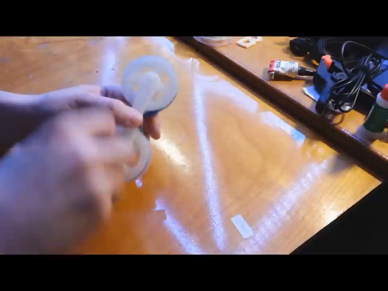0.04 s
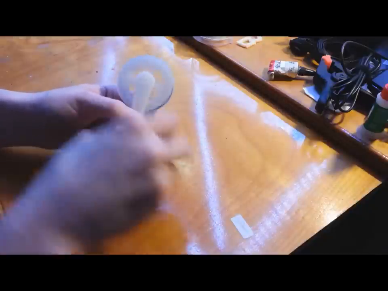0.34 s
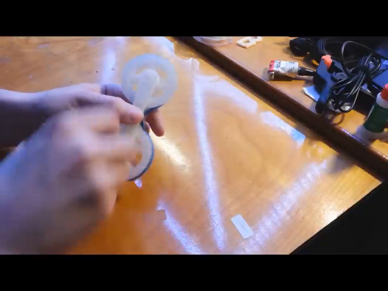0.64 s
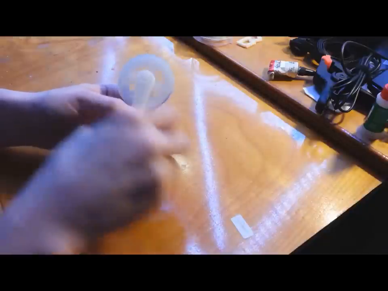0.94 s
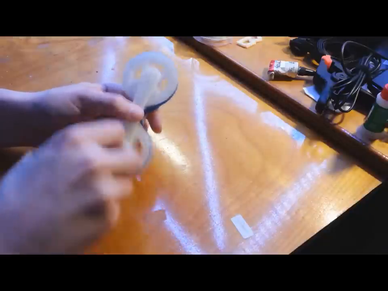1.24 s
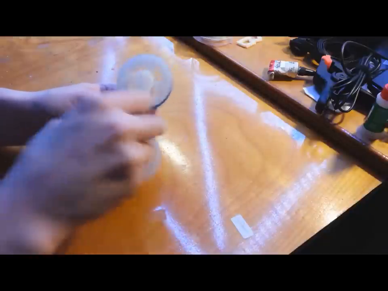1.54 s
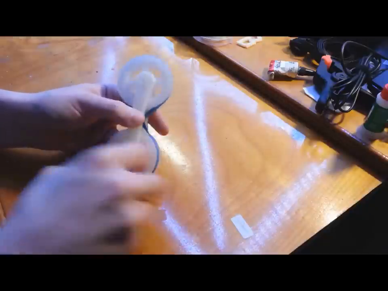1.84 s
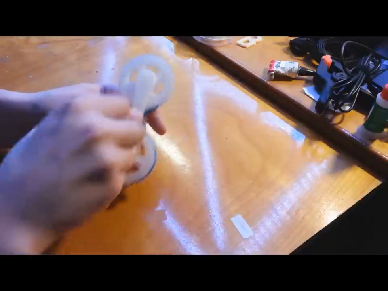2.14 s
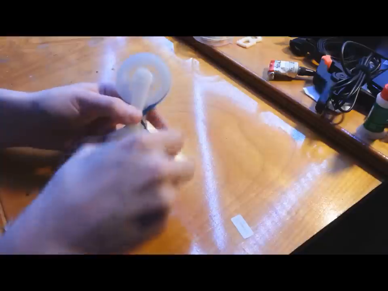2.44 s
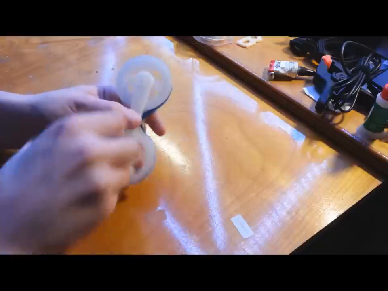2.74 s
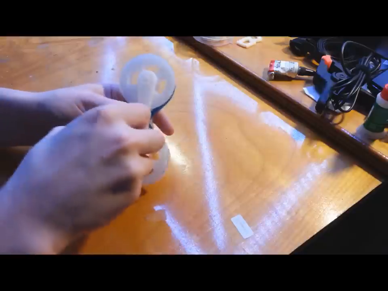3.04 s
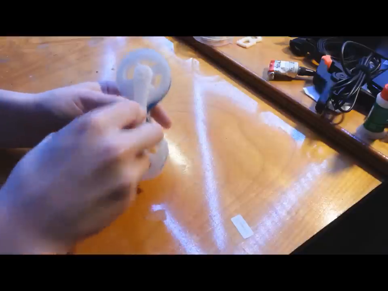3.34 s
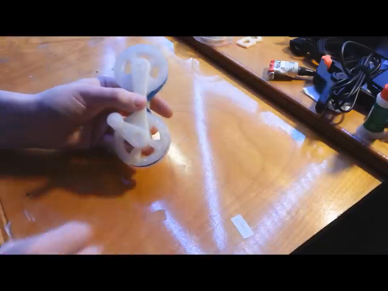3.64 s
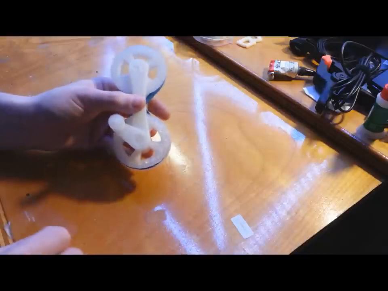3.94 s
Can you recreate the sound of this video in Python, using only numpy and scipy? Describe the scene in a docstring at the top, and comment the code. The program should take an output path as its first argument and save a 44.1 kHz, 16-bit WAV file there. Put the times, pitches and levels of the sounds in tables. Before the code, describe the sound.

A small plastic pulley squeaks, ticks and rubs as it is turned, over steady fan noise.

```python
"""A small plastic pulley, cranked by hand above a desk in a small room.
Its dry axle grips and slips in three short squeaks. Around them the loose plastic parts tick and
the wheel rubs on its frame, both ringing the same plastic modes. The hand bumps softly as it
lets go. A fan hums and hisses steadily behind."""
import sys
import numpy as np
from scipy import signal
from scipy.fft import rfft, irfft
from scipy.io import wavfile

SR = 44100
rng = np.random.default_rng(int(sys.argv[2]) if len(sys.argv) > 2 else 0)


def output_pcm(signal):
    """Save a mono or channel-first signal as 16-bit PCM at the path in sys.argv[1].

    Samples are clipped to [-1, 1] before scaling.
    """
    pcm = np.clip(np.atleast_2d(signal).T, -1, 1) * 32767
    wavfile.write(sys.argv[1], SR, np.round(pcm).astype(np.int16))


N = 176400
T = np.arange(N) / SR


def from_db(db):
    """Decibels to gain."""
    return 10 ** (np.asarray(db) / 20)


def coloured(gain_at):
    """Noise of unit rms whose spectrum follows a function of frequency."""
    hz = np.maximum(np.fft.rfftfreq(N, 1 / SR), 1e-3)
    noise = irfft(rfft(rng.standard_normal(N)) * gain_at(hz), N)
    return noise / np.sqrt(np.mean(noise ** 2) + 1e-20)


def drift(rate_hz):
    """Smooth random modulation of unit rms."""
    return coloured(lambda hz: 1 / (1 + (hz / rate_hz) ** 2))


def swell(middle_s, half_s):
    """A bell-shaped rise and fall."""
    return np.exp(-((T - middle_s) / half_s) ** 2)


def ring(force, hz, t60):
    """One damped mode; a unit click rings it at about height 1."""
    radius, angle = np.exp(-np.log(1000) / (t60 * SR)), 2 * np.pi * hz / SR
    return signal.lfilter([1, 0, -1], [1, -2 * radius * np.cos(angle), radius ** 2], force + 1e-18) / 2


def fan():
    """The fan's bed: steady hiss under a few wavering hum tones."""
    # hiss spectrum: f/Hz, relative level/dB
    hiss = [(20, -28), (35, -21), (70, 1.5), (140, -1), (220, -1), (320, 0.5), (430, -5.5), (560, -1),
            (800, -6.5), (1100, -8.5), (1400, -9.5), (2000, -11), (2500, -14), (2900, -16), (4200, -14.5),
            (5100, -15), (6000, -19.5), (7000, -23.5), (10000, -25.5), (15500, -24)]
    # hum tones: f/Hz, rms level/dB
    hum = [(42, -55), (92, -46.5), (184.5, -42), (249.7, -37), (333.7, -49), (357, -49), (527, -51),
           (684, -52.5), (1376, -53)]
    hiss_db, waver_db, wander_hz = -31.5, 2, 1.603
    hiss_hz, shape_db = np.transpose(hiss)
    out = from_db(hiss_db) * coloured(lambda hz: from_db(np.interp(np.log(hz), np.log(hiss_hz), shape_db)))
    for hz, db in hum:
        phase = 2 * np.pi * (np.cumsum(hz + wander_hz * drift(rate_hz=4.16)) / SR + rng.random())
        out += np.sqrt(2) * from_db(db + waver_db * drift(rate_hz=14)) * np.sin(phase)
    return out


def plastic(low_force, high_force):
    """The body of wheel and frame: modes of alternating polarity, lows and highs driven separately."""
    # plastic modes: f/Hz, level/dB, t60/s
    modes = [(1350, -15, 0.007), (2100, -18, .012), (2760, -13.5, 0.015), (3130, -11, 0.008),
             (3625, -10.5, 0.011), (4070, -6, 0.0076), (4737, -5.5, 0.0082), (5120, -2.5, 0.0057),
             (5820, -5.5, 0.0062), (6630, -5.5, 0.0029), (7480, -14, 0.0084), (8160, -13.5, .006),
             (9900, -14.5, 0.0021), (11750, -13.5, 0.0037)]
    split_hz = 4737
    return sum((-1) ** k * from_db(db) * ring(low_force if hz < split_hz else high_force, hz, t60)
               for k, (hz, db, t60) in enumerate(modes))


def crack(force):
    """The bright edge of a contact, heard directly."""
    return signal.sosfilt(signal.butter(2, 6400, "high", fs=SR, output="sos"), force + 1e-18)


def rubbing():
    """Dense tiny catches of plastic on plastic, swelling where the wheel touches the frame."""
    # light friction while the wheel turns: t/s, level/dB
    turning = [(0, -37), (1.0, -44), (2.0, -44.5), (2.75, -39.5), (2.95, -62), (4, -63)]
    # wheel against frame: middle t/s, half length/s, level/dB, low-mode boost/dB
    rubs = [(0.164, 0.02, -42, 6), (0.272, 0.038, -34, 3), (0.332, 0.021, -30, -2), (.39, 0.037, -38, 1),
            (0.562, 0.011, -29, 5), (0.717, 0.067, -37.5, 1.5), (0.904, .012, -33.5, 1.5),
            (0.95, 0.03, -31.5, -0.5), (1.184, 0.017, -36, 2), (1.232, 0.013, -31.5, 1),
            (1.253, 0.0062, -26.5, -2), (1.382, 0.032, -35, -2), (1.623, 0.054, -34.5, 2.5),
            (1.76, 0.058, -39, 4), (2.073, 0.0042, -29.5, 5), (2.089, 0.015, -27, -4), (2.304, .03, -38, 2),
            (2.385, .015, -33.5, 1), (2.47, 0.018, -34, 1), (2.659, 0.022, -31.5, 1.5),
            (2.714, 0.01, -33.5, -2), (2.819, .015, -33.5, -3), (3.149, 0.011, -30, -6),
            (3.185, 0.023, -37.5, -10), (3.628, .04, -39.5, -2)]
    grains_per_s, spread_db, trim_db = 2500, 2.5, -0.5
    sizes = from_db(spread_db * np.minimum(rng.exponential(1, N), 4)) * rng.choice([-1, 1], N)
    grains = sizes * (rng.random(N) < grains_per_s / SR)
    grains = from_db(trim_db) * grains / np.std(plastic(grains, grains))
    power = low_power = from_db(np.interp(T, *np.transpose(turning))) ** 2
    for middle_s, half_s, db, low_db in rubs:
        touch = from_db(db) * swell(middle_s, half_s)
        power = power + touch ** 2
        low_power = low_power + (from_db(low_db) * touch) ** 2
    force = grains * np.sqrt(power)
    return plastic(grains * np.sqrt(low_power), force) + from_db(-1) * crack(force)


def ticks():
    """Loose parts take up their play: a click and a brief crunch ring the struck spot and the wheel."""
    # contacts: t/s, strength/dB, struck spot f/Hz, relative crack/dB, relative low modes/dB
    contacts = [(0.0044, -9.5, 5200, -2, 1), (0.13, -20.5, 4600, 2, 6), (0.177, -15.5, 5300, -1, 3.5),
                (0.3252, -7.5, 5500, -6, 1), (0.3361, -11, 5430, -10, 0), (0.3912, -5, 5500, 1.5, 1.5),
                (0.4834, -18, 5400, -5, -3), (0.5277, -8.5, 6000, -7, 0), (0.5583, -13, 6030, 7, 1),
                (0.5674, -23, 6000, 1, 4), (0.77, -14, 5000, 0, 3), (0.7763, 5.5, 5440, 1, -10),
                (0.9562, -9, 5500, -6, -4), (1.001, -6, 5470, -1, -2), (1.1154, -15.5, 6000, -3, -6),
                (1.1853, -21, 7800, 9, 3), (1.193, -19, 7700, 1, 2), (1.2, -14, 5750, -5, 1),
                (1.22, -21, 4300, 4, 8), (1.345, -16, 5000, 3, 4), (1.3512, -15, 5600, -2, -3),
                (1.6246, -20, 4050, 3, 8), (1.723, -1, 5840, -6, -9.5), (1.7671, -23, 5000, 2, 7),
                (1.8068, -16, 6100, -4, -1), (1.8367, -17.5, 5200, 0, 3), (1.9096, -15, 5400, -5, 6.5),
                (1.9637, -9, 6700, 11.5, -3), (2.0874, -10, 5300, -4, -4), (2.1174, -17, 5460, -3, 1),
                (2.3902, -5, 5100, -8, -16), (2.4551, -6, 6350, 0, -1), (2.476, -24, 6200, 8, 3),
                (2.55, -14.5, 6900, -2, -3), (2.6088, -14, 5050, -1, 1), (2.6472, -18.5, 5200, 3, 5),
                (2.654, -15, 5600, -1, 3), (2.666, -22, 4100, 0, 3), (2.8266, -16.5, 5300, 4, 1.5),
                (3.2001, -17, 6300, -3, -9), (3.2117, -16.5, 5700, -3, -4), (3.686, -26, 8800, 17.5, -6)]
    trim_db, crunch_db, typical_db, attack_s = -11, -6.5, -11.5, 0.00056
    age = np.arange(SR // 25) / SR
    attack = 1 - np.exp(-age / attack_s)
    out = np.zeros(N + SR)
    for onset_s, db, spot_hz, crack_db, low_db in contacts:
        # harder ticks snap faster and their spot rings longer
        decay_s = 0.0027 * from_db(-0.34 * (db - typical_db))
        spot_t60 = 0.0038 * from_db(0.15 * (db - typical_db))
        contact = from_db(crunch_db) * rng.standard_normal(len(age)) * attack * np.exp(-age / decay_s)
        contact[int(attack_s * SR)] += 1  # the click
        force = from_db(trim_db + db) * contact
        spot = from_db(-2.5) * ring(force, spot_hz, spot_t60)
        body = plastic(from_db(low_db) * force, from_db(-4) * force)
        edge = from_db(2 + crack_db) * crack(force)
        start = int(onset_s * SR)
        out[start:start + len(age)] += spot + body + edge
    return out[:N]


def squeaks():
    """Axle stick-slip: a harmonic tone that jitters more as it rasps harder; the wheel sings on briefly."""
    # squeak contours: t/s, slip f/Hz, fundamental/dB, octave/dB, third harmonic/dB, rasp/dB
    first = [(0.01, 1740, -47, -38, -31, -35), (0.015, 1700, -21, -31, -36, -33),
             (0.0174, 1634, -15, -15, -13, -30), (0.0205, 1644, -8, -16, -5.5, -19),
             (0.023, 1607, -14, -12, -23, -25), (0.0261, 1864, -14.5, -28, -28, -30),
             (0.029, 1750, -29, -15, -29, -31), (0.031, 1630, -31, -18, -32, -32)]
    second = [(0.584, 1787, -32, -36, -35, -36), (0.59, 1730, -20, -27, -31, -38),
              (0.593, 1667, -16.5, -13, -10, -32), (0.596, 1704, -9, -12.5, -14, -28),
              (0.601, 1753, -16, -11, -30, -21), (0.607, 1683, -14, -13.5, -12.5, -21),
              (0.612, 1700, -13, -15, -7.5, -28), (0.6148, 1705, -22, -11, -10, -28),
              (0.616, 1830, -14, -22, -21, -21), (0.6236, 1820, -10.5, -17, -23, -25),
              (0.6253, 1990, -14.5, -7.5, -19, -21), (0.628, 1870, -24, -32, -23, -24)]
    third = [(1.906, 1771, -34, -38, -34, -39), (1.916, 1865, -24, -43, -41, -38),
             (1.922, 1971, -13.5, -23, -38, -36), (1.927, 1760, -14.5, -28, -24, -24),
             (1.93, 1737, -15, -12.5, -17.5, -19), (1.936, 1713, -23, -31, -30, -28),
             (1.939, 1770, -19, -23, -25, -33), (1.946, 1795, -18, -28, -25, -31),
             (1.9485, 1976, -13.5, -15, -18.5, -27), (1.953, 1800, -29, -25, -25, -33)]
    # upper partials, a row per squeak: harmonics four to nine, each as level/dB relative to the third
    overtones = [(-13, -18, -18, -20, -31, -29), (-12, -9.5, -23, -29, -28, -24),
                 (-21, -12.5, -24, -17, -24, -19)]
    # uneven slipping, a row per squeak: jitter/share of slip rate, flutter of each harmonic/dB
    roughness = [(.008, -0.5), (0.012, 1.15), (.018, 2)]
    # wheel resonances that a squeak leaves ringing: f/Hz, width/Hz, level/dB
    resonances = [(3350, 45, -10), (3640, 32, 3), (3900, 40, -3), (5000, 30, -8)]
    fade_s, rasp_hz, typical_rasp_db = 0.002, 4450, -23
    jitter = drift(rate_hz=1200)
    rasp_noise = coloured(lambda hz: np.minimum(hz / rasp_hz, rasp_hz / hz))
    flutter = np.array([drift(rate_hz=328) for _ in range(9)])  # one per harmonic
    offsets = 2 * np.pi * rng.random(len(flutter))
    out = np.zeros(N)
    for contour, upper_db, (unevenness, flutter_db) in zip((first, second, third), overtones, roughness):
        times, *columns = np.transpose(sorted(contour))
        gate = np.clip(1 + np.minimum(T - times[0], times[-1] - T) / fade_s, 0, 1)
        on = gate > 0
        slip_hz, root_db, octave_db, third_db, rasp_db = [np.interp(T[on], times, c) for c in columns]
        wobble = unevenness * from_db(0.5 * (rasp_db - typical_rasp_db)) * jitter[on]
        phase = 2 * np.pi * np.cumsum(slip_hz * (1 + wobble)) / SR
        levels = [root_db, octave_db, third_db] + [third_db + db for db in upper_db]
        tone = sum(from_db(db + flutter_db * flutter[k, on]) * np.sin((k + 1) * phase + offsets[k])
                   for k, db in enumerate(levels))
        rasp = from_db(rasp_db) * rasp_noise[on] * (1 + np.cos(phase)) / 2  # one pulse per slip
        out[on] += gate[on] * (tone + rasp)
    singing = sum(from_db(db) * signal.lfilter(*signal.iirpeak(hz, hz / width_hz, fs=SR), out + 1e-18)
                  for hz, width_hz, db in resonances)
    return out + singing


def bump():
    """A soft, lumpy low thud as the hand lets go."""
    centre_hz, half_width_hz = 63, 12
    rumble = coloured(lambda hz: 1 / (1 + ((hz - centre_hz) / half_width_hz) ** 2))
    return from_db(-33) * swell(middle_s=3.19, half_s=0.079) * rumble


def room(sound):
    """Desk and walls return a short, slightly dull tail and one band-limited echo."""
    t60_s, predelay_s, damping_hz, tail_db = 0.19, 0.007, 9000, -10
    echo_s, echo_band_hz, echo_db = 0.034, (2500, 4200), -14.5
    age = np.arange(SR // 2) / SR
    tail = rng.standard_normal(len(age)) * np.exp(-np.log(1000) * age / t60_s) * (age > predelay_s)
    tail = signal.sosfilt(signal.butter(2, damping_hz, fs=SR, output="sos"), tail / np.linalg.norm(tail))
    delayed = np.interp(T - echo_s, T, sound, left=0)
    echo = signal.sosfilt(signal.butter(2, echo_band_hz, "band", fs=SR, output="sos"), delayed)
    return from_db(tail_db) * signal.fftconvolve(sound, tail)[:N] + from_db(echo_db) * echo


def scene():
    """The pulley in its room with the hand bump and the fan, mono on both channels."""
    pulley = squeaks() + ticks() + rubbing()
    return np.tile(pulley + room(pulley) + bump() + fan(), (2, 1))


def record(dry):
    """A steep low-pass takes off the very top."""
    cutoff_hz = 15720
    return signal.sosfilt(signal.ellip(12, .1, 80, cutoff_hz, fs=SR, output="sos"), dry)


dry = scene()
out = record(dry)
output_pcm(out)
```